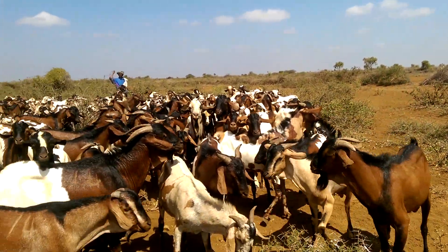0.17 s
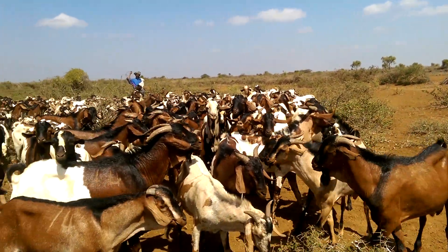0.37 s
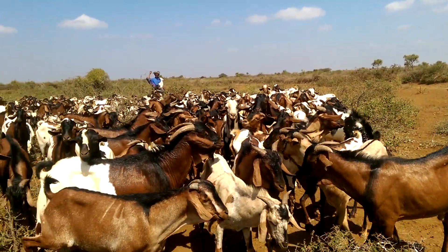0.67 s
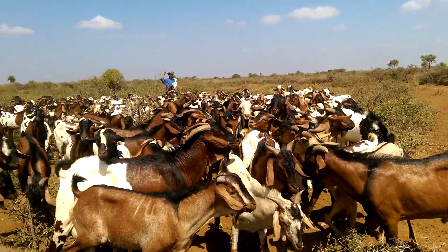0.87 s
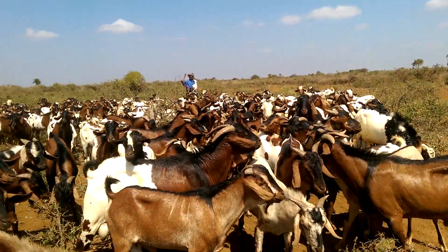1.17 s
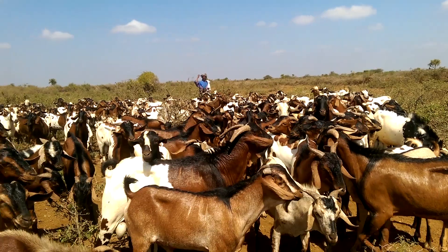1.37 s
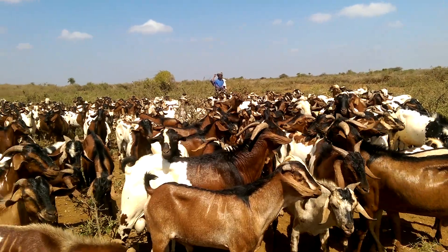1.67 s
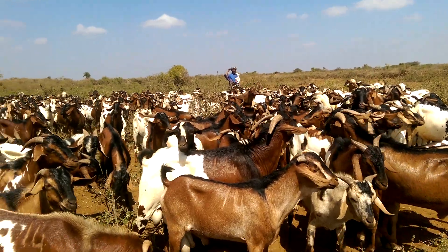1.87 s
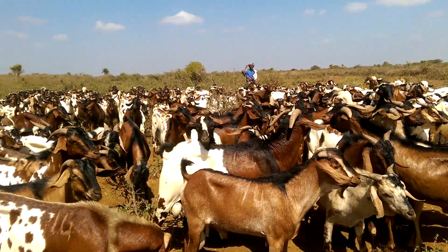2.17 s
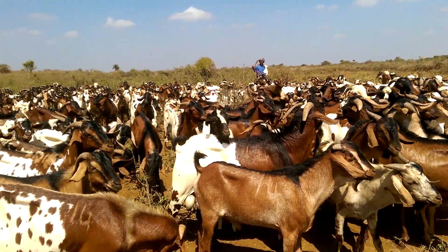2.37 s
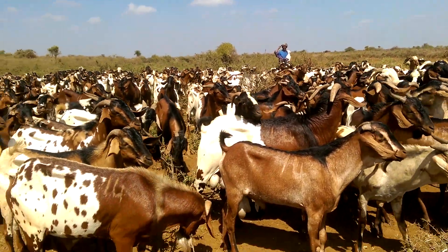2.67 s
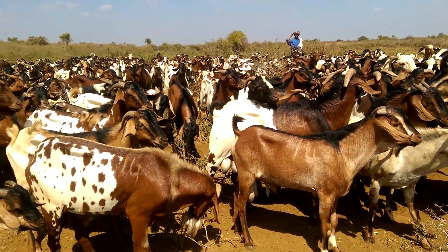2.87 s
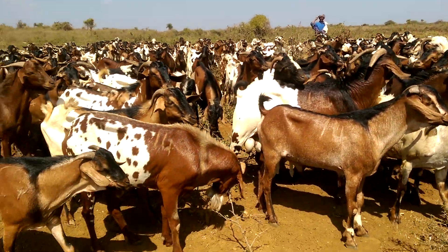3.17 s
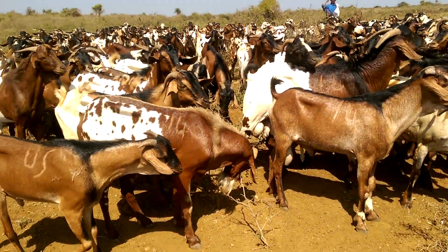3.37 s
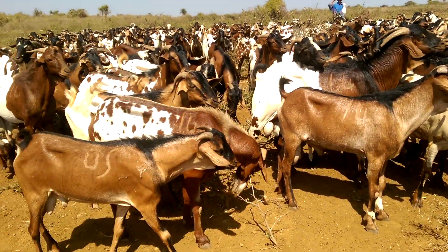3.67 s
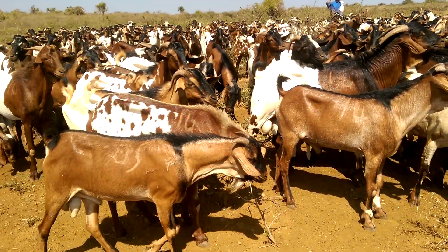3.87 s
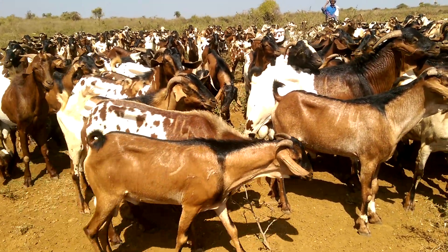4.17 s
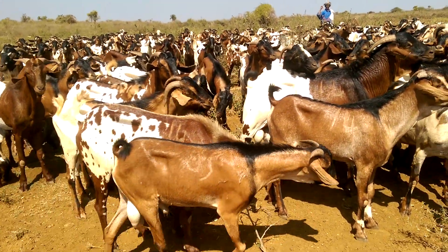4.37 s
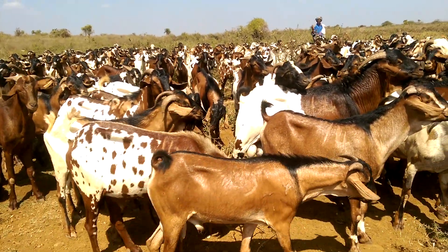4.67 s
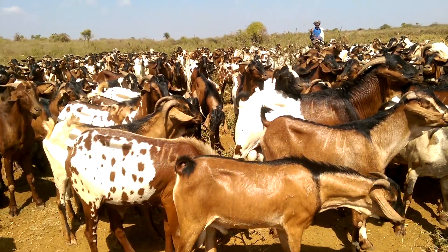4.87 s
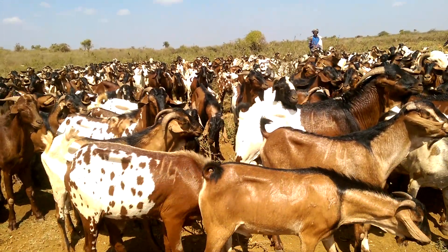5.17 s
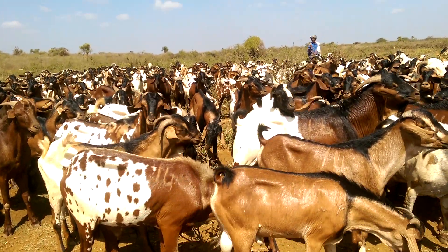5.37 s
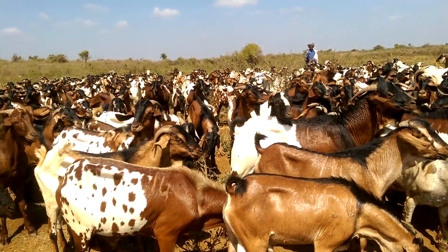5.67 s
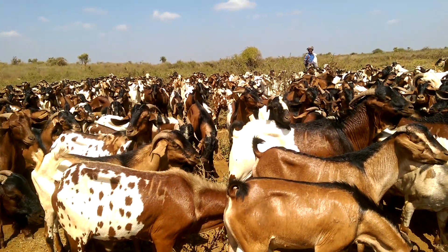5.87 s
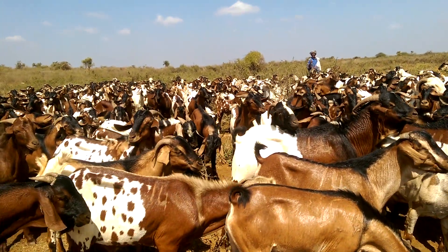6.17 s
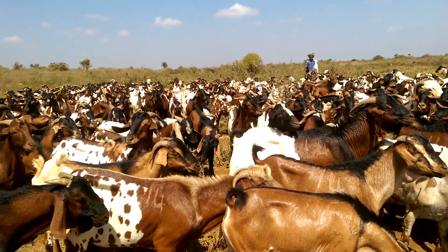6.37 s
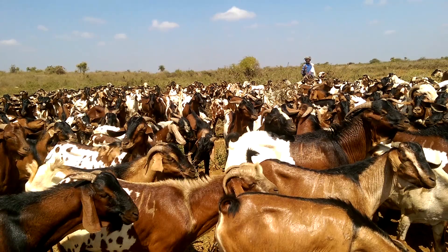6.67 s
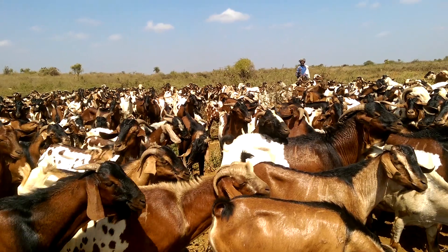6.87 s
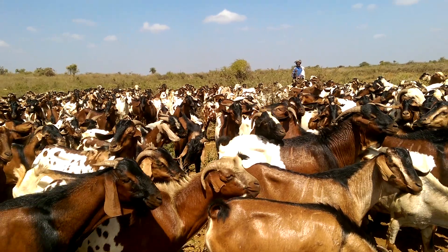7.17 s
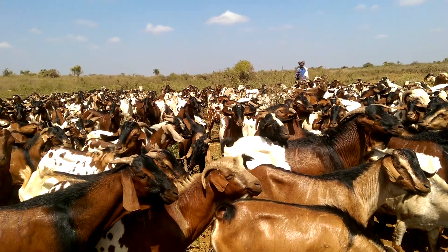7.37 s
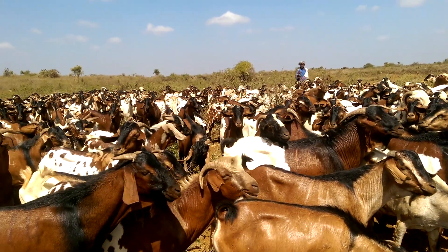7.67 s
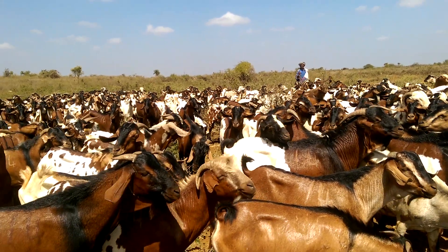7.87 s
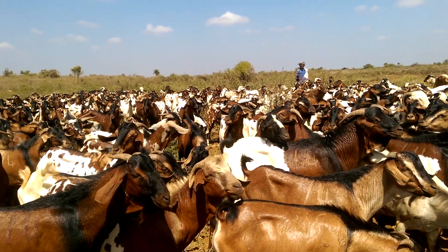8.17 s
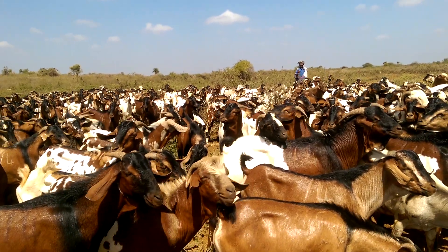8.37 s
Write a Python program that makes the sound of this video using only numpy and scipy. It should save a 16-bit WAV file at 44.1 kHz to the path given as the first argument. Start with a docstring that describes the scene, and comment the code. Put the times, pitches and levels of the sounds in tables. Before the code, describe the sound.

Loud rumbling, fluttering wind nearly covers the soft patter of many goat hooves, with occasional sharp twig snaps and brief scuffs of grit.

```python
"""Goat herd on a windy plain

A large herd of goats shuffles over dry ground while wind rumbles over the two ports of a bare microphone.
Wind is a frozen noise field blown past each port at its own drifting, gusting and lulling speed.
Large eddies thud as decaying low noise; at the right port, filtered noise adds rasps and hisses.
Hooves, mostly to the left, tick and shuffle as random noise bursts, scuff grit and snap twigs with
clicks and decaying grains; distant hooves merge into a wash of coloured noise."""
import sys
import numpy as np
from scipy import signal
from scipy.fft import rfft, irfft
from scipy.io import wavfile
from scipy.ndimage import uniform_filter1d

SR = 44100
rng = np.random.default_rng(int(sys.argv[2]) if len(sys.argv) > 2 else 0)


def bounce(signal):
    """Save signal as a 16-bit WAV file at the path given by the first command-line argument."""
    frames = np.transpose(np.atleast_2d(signal))
    limited = np.clip(frames, -1, 1)
    pcm = np.round(limited * 32767).astype(np.int16)
    wavfile.write(sys.argv[1], SR, pcm)


N = 375291
TIME = np.arange(N) / SR  # s

# How much the air churns rather than streams smoothly, which sets the share of large eddies.
# Each row: time in seconds, relative strength in dB.
CHURN = [(0, -1.5), (.6, -4), (1.2, 0.5), (3.0, 2.5), (4.4, 4), (4.7, 0.5), (5.75, 6.5), (6.1, 0), (7.5, 0),
         (8.5, -6)]
# Spectrum of hooves and twigs on grit. Each row: frequency in Hz, relative gain in dB.
GRIT = [(400, -8.5), (1400, 1.5), (3300, 3.5), (5200, 6.5), (7200, 2.5), (9600, 9), (11500, 2),
        (15500, -18.5)]


def amp(db):
    """Level law: an amplitude ratio is 10 to the power of its decibels over 20."""
    return 10 ** (np.asarray(db) / 20)


def unit(x):
    """Normalisation: scales a signal to an RMS of 1."""
    return x / np.sqrt(np.mean(x ** 2) + 1e-20)


def curve(rows):
    """Linear interpolation: joins (s, value) rows by straight lines."""
    return np.interp(TIME, *np.transpose(rows))


def colour(x, points):
    """Minimum-phase filtering: a causal response of unit energy follows the (Hz, dB) spectrum."""
    size = 1024
    hz, db = np.transpose(points)
    bin_hz = abs(np.fft.fftfreq(size, 1 / SR))
    gain_db = np.interp(np.log(bin_hz + 1), np.log(hz), db)
    log_gain = np.log(amp(gain_db))
    # the Hilbert transform of the log gain supplies the minimum phase
    response = np.exp(np.conj(signal.hilbert(log_gain)))
    taps = np.fft.ifft(response).real[:size // 2]
    return signal.oaconvolve(x, taps / np.linalg.norm(taps))[:N]


def eddies(corner_hz, steepness, size=N):
    """Turbulence spectrum: unit noise, flat up to a corner and falling as a power law above it."""
    hz = np.fft.rfftfreq(size, 1 / SR)
    gain = 1 / (1 + (hz / corner_hz) ** 2) ** (steepness / 2)
    return unit(irfft(rfft(rng.standard_normal(size)) * gain, size))


def butter(x, hz, kind, order):
    """Maximally flat filtering: a causal Butterworth section passes its band without ripple."""
    sections = signal.butter(order, min(hz, .45 * SR), kind, fs=SR, output="sos")
    return signal.sosfilt(sections, x)


def swell(s, length, rise, fall):
    """Generalised Gaussian: a hump of height 1 at s, length wide at 1/e; high exponents square its sides."""
    away, hump = 2 * (TIME - s) / length, np.zeros(N)
    near = abs(away) < 4
    exponent = np.where(away[near] < 0, rise, fall)
    hump[near] = np.exp(-abs(away[near]) ** exponent)
    return hump


def air_speed(drift, port, sway_db, sway_hz, flutter_db, flutter_hz):
    """Superposition of speeds in dB: drift, gusts and lulls, with sway and flutter that grow with churn."""
    # Gusts, from brief slaps to long shoves, by port.
    # Each row: centre in seconds, added air speed in dB, length in seconds.
    gust_rows = {"left": [(.078, 6, 0.056), (.86, 6.5, .016), (1.525, 6.5, 0.045), (1.86, 4.5, 0.07),
                 (2.285, 4, .02), (2.965, 5, 0.093), (3.11, 5.5, 0.055), (3.425, 5.5, 0.055),
                 (3.52, 7, 0.019), (3.568, 5.5, 0.036), (3.634, 5, 0.03), (3.738, 5.5, .02),
                 (3.811, 5.5, .12), (4.003, 5, 0.043), (4.057, 6.5, 0.018), (4.31, 5.5, 0.034),
                 (4.41, 4, 0.075), (4.468, 6, 0.023), (4.538, 5, 0.034), (4.637, 6, 0.015),
                 (4.91, 4.5, 0.037), (5.771, 6, .054), (6.092, 8.5, 0.045), (6.164, 8.5, .11),
                 (6.238, 7.5, 0.075), (6.296, 7.5, 0.032), (6.364, 6, 0.031), (6.529, 8, 0.07),
                 (6.587, 5, 0.037), (6.906, 7.5, 0.13), (7.355, 6, 0.061), (7.52, 3, 0.067),
                 (7.842, 6, .012), (8.155, 4.5, 0.044)], "right": [(.085, 5.5, 0.067), (.897, 3.5, 0.055),
                 (1.235, 4, 0.033), (1.353, 4, 0.039), (2.093, 4, .024), (2.169, 5, 0.018),
                 (2.282, 5.5, 0.0087), (2.43, 4, 0.032), (2.526, 5.5, 0.035), (2.687, 9.5, 0.008),
                 (2.953, 6, 0.0047), (3.018, 4.5, .012), (3.186, 6, .018), (3.616, 5, 0.0061),
                 (3.634, 8, 0.0085), (3.869, 5.5, .018), (3.898, 6, 0.0038), (4.146, 8.5, .016),
                 (4.16, 10.5, 0.0063), (4.338, 6.5, 0.045), (4.401, 8, 0.021), (4.505, 7, 0.055),
                 (4.741, 5.5, .014), (4.815, 5.5, 0.053), (5.11, 5, 0.027), (5.23, 4, 0.041),
                 (5.474, 6, .028), (5.643, 5.5, 0.0097), (5.857, 6, 0.0077), (6.362, 4.5, .016),
                 (6.813, 7, 0.029), (7.071, 9.5, 0.013), (7.101, 8, 0.009), (7.138, 4.5, 0.0081),
                 (7.748, 8.5, .04), (7.842, 5.5, 0.0098), (8.06, 4.5, 0.061), (8.337, 7, 0.016)]}
    # Lulls, when the flow leaves a port for a moment, by port.
    # Each row: centre in seconds, lost air speed in dB, length in seconds.
    lull_rows = {"left": [(2.11, 5, 0.13), (2.381, 6.5, .04), (4.737, 3, .14), (5.068, 6, .022),
                 (5.132, 7, 0.047), (7.44, 7, 0.059), (7.75, 7, .14), (8.239, 7, 0.072),
                 (8.385, 6.5, 0.067)], "right": [(.186, 4, 0.045), (.81, 4, .055), (1.568, 5, 0.076),
                 (2.053, 10, 0.05), (2.339, 5, .024), (2.49, 6, .022), (2.798, 5, 0.099),
                 (3.143, 5.5, .044), (3.665, 3, 0.04), (5.332, 3.5, 0.045), (5.827, 4.5, 0.039),
                 (8.401, 4.5, .028)]}
    slap_s = 0.0782  # the briefer a gust is against this, the more it sweeps the small eddies aside
    top_speed_db = 11  # here sway and flutter are halved: fast air has little room to speed up further

    speed_db, free = curve(drift), np.ones(N)
    for s, db, length in gust_rows[port]:
        shape = swell(s, length, rise=3.5, fall=2.2)
        speed_db = speed_db + db * shape
        free = free * (1 - shape * np.exp(-length / slap_s))
    for s, db, length in lull_rows[port]:
        speed_db = speed_db - db * swell(s, length, rise=3.45, fall=3.45)

    # lopsided flutter: brief puffs stand out of a calmer flow
    puffs = np.tanh(0.249 * np.exp(0.5 * eddies(flutter_hz, 1.7)))
    flutter = flutter_db * unit(puffs - puffs.mean())
    slow = butter(eddies(sway_hz, 4.15), sway_hz / 2, "highpass", order=2)
    sway = sway_db * unit(slow)
    churning = amp(0.712 * np.minimum(curve(CHURN), 1.2))
    unrest = churning / (1 + amp(2 * (speed_db - top_speed_db)))
    return speed_db + free * unrest * (sway + flutter)


def turbulence(speed_db, corner_hz, steepness, growth, large_hz):
    """Frozen turbulence: eddies are carried past the port, so faster air is both louder and higher."""
    field = eddies(corner_hz, steepness, size=2 ** 20)
    field = field / np.sqrt(uniform_filter1d(field ** 2, size=2000))  # equally strong all along its length
    travelled = np.cumsum(amp(speed_db)) % len(field)  # 0 dB moves one field sample per output sample
    passing = np.interp(travelled, np.arange(len(field)), field)
    pressure = passing * amp(growth * speed_db)  # growth: dB of level per dB of speed

    # churning air and sudden surges carry more large, deep eddies, and they arrive in lumps
    large = signal.sosfiltfilt(signal.butter(1, large_hz, fs=SR, output="sos"), pressure)
    surge_db = uniform_filter1d(speed_db, size=1000) - uniform_filter1d(speed_db, size=20000)
    lumps_db = 4.5 * eddies(61.4, 6.1)
    large_db = curve(CHURN) + 0.38 * surge_db + lumps_db - 1.7
    return pressure + (amp(large_db) - 1) * large


def left_wind():
    """Convected turbulence with a steep spectrum: round, dull buffets with deep lulls between them."""
    # Slow drift of the air speed at the left port. Each row: time in seconds, speed in dB over a light breeze.
    drift = [(0, 4), (.7, 3), (1.45, 3.5), (1.62, -2), (2.12, .5), (2.42, 9), (2.82, 0.97), (3.6, 4),
             (4.6, 3), (5.25, 8.5), (5.42, 2.5), (5.97, 1), (6.42, 1.5), (7.02, -5), (7.55, 5.5), (8.51, 0)]
    speed_db = air_speed(drift, port="left", sway_db=0.93, sway_hz=18.71, flutter_db=0.95, flutter_hz=57.7)
    rumble = amp(-23.5) * turbulence(speed_db, corner_hz=166.7, steepness=4.01, growth=1.397, large_hz=134)
    return butter(rumble, 60.7, "highpass", order=2)


def crackle(x, above_hz, depth_db, burst_hz):
    """Intermittency: the smallest eddies come in brief bursts, so the top of the rumble crackles."""
    low = signal.sosfiltfilt(signal.butter(2, above_hz, fs=SR, output="sos"), x)
    bursts = unit(amp(depth_db * eddies(burst_hz, 1.22)))
    return low + (x - low) * bursts


def cavity(x, hz, q, boost_db):
    """Cavity resonance: a hollow in the body adds back a band around its resonance at boost_db."""
    return x + amp(boost_db) * signal.lfilter(*signal.iirpeak(hz, q, fs=SR), x)


def right_wind():
    """Convected turbulence and edge noise: a rougher, brighter flutter with rasps and short hisses."""
    # Slow drift of the air speed at the right port. Each row: time in seconds, speed in dB over a light breeze.
    drift = [(0, 3), (.35, 1.5), (.5, 5), (1, 3.5), (1.65, 3), (2, .5), (2.2, 4.5), (2.4, 5.5), (3.3, 5.5),
             (3.5, 9), (4.6, 5), (4.68, 1), (5.23, 5), (5.98, 4), (6.1, 10), (6.38, 8), (6.63, -3.5),
             (7.43, 5), (7.7, 0.5), (8.51, -1.7)]
    # Air skimming the edge of the port in short hisses.
    # Each row: centre in seconds, relative hiss level in dB, length in seconds.
    skim_rows = [(0.601, -58, 0.32), (1.349, -55.5, 0.092), (3.5, -49.5, 0.26), (3.515, -52.5, 0.093),
                 (3.733, -49, 0.075), (3.797, -50, 0.06), (3.943, -52.5, 0.042), (4.264, -49, 0.029),
                 (4.819, -51.5, 0.04), (5.479, -51, 0.083), (5.644, -53, 0.028), (6.16, -62.5, 0.11),
                 (7.455, -59, 0.1)]
    # Spectra of the skimming hiss and of the tearing rasp. Each row: frequency in Hz, relative gain in dB.
    skim_colour = [(300, -5.5), (1200, 18.5), (2400, 10.5), (4000, -1), (7500, -11), (10000, -24),
                   (15000, -30)]
    rasp_colour = [(500, -14), (2000, -14), (3200, 7), (4800, -15.5), (7200, -20), (10000, -45.5)]

    speed_db = air_speed(drift, port="right", sway_db=1.01, sway_hz=20.14, flutter_db=1.5, flutter_hz=74.34)
    rumble = amp(-23.5) * turbulence(speed_db, corner_hz=194.0, steepness=2.99, growth=0.74, large_hz=132)
    rumble = crackle(rumble, above_hz=1080, depth_db=5.0, burst_hz=170)
    rumble = cavity(rumble, hz=370, q=0.71, boost_db=-6.0)
    rumble = cavity(rumble, hz=3050, q=1.81, boost_db=1.5)
    rumble = butter(rumble, 55.0, "highpass", order=2)
    rumble = butter(rumble, 2810, "lowpass", order=4)

    # in the fastest gusts the flow tears off the edge with a rasp that rings in the port
    tearing = amp(-27.5) / (0.5 + np.exp(0.75 * (16.0 - speed_db)))
    torn_air = rng.standard_normal(N) * tearing * amp(4.1 * eddies(150, 1.6))
    rasp = colour(torn_air, rasp_colour)

    skimming = sum(amp(db) * swell(s, length, rise=4.3, fall=3.2) for s, db, length in skim_rows)
    hiss = rng.standard_normal(N) * skimming * amp(13.0 + 4.0 * eddies(90, 1.06))
    return rumble + rasp + colour(hiss, skim_colour)


def patter(per_s, spread_db, fade_s, count=10):
    """Shot noise: hooves land at random; each patch of ground gives its own short, gritty burst."""
    t, out = TIME[:SR // 10], np.zeros(N)
    for _ in range(count):
        landings = rng.random(N) < per_s / count / SR
        strength_db = spread_db * np.minimum(rng.exponential(1, N), 2.5)
        steps = landings * amp(strength_db)
        burst = rng.standard_normal(len(t)) * np.sqrt(t / fade_s) * np.exp(-t / fade_s)
        burst = butter(burst, rng.uniform(5000, 18000), "lowpass", order=1)
        out += signal.oaconvolve(steps, burst)[:N]
    return unit(colour(out, GRIT))


def far_herd():
    """Incoherent summation: distant hooves merge into a soft, slowly swelling wash of noise."""
    # Spectrum of the distant herd. Each row: frequency in Hz, relative gain in dB.
    wash_colour = [(400, -8), (3000, -4), (7000, -11.5), (9600, -9.5), (12000, -15), (15500, -15.5)]
    return colour(rng.standard_normal(N), wash_colour) * amp(0.48 * eddies(5.9, 2))


def thumps(port, corner_hz, rise_s):
    """Transient pressure: a large eddy bursts on the port and rolls off in a few deep cycles."""
    # Single large eddies, by port. Each row: start in seconds, peak level in dB.
    thump_rows = {"left": [(.238, -5.5), (1.721, -6.5), (1.963, -8.5), (5.76, -5.5), (6.928, -8.5),
                  (8.308, -11.5), (8.432, -8.5)], "right": [(4.393, -9), (5.455, -9), (7.73, -0.5),
                  (8.027, -5.5), (8.33, -8)]}
    out, age = np.zeros(N), TIME[:SR // 10] / rise_s
    for s, db in thump_rows[port]:
        start = round(s * SR)
        push = eddies(corner_hz, 4.2, size=len(age)) * age * np.exp(-age)
        thud = butter(push, corner_hz / 2, "highpass", order=2)
        out[start:start + len(age)] += (amp(db) * thud / abs(thud).max())[:N - start]
    return out


def snaps(crack_s, crumble_s, crumble_db, click_db):
    """Brittle fracture: each break is one broadband click with a gritty crack and a short crumble."""
    # Twigs and pebbles cracking under near hooves. Each row: start in seconds, relative level in dB.
    breaks = [(0.7523, -35.5), (1.0312, -33.5), (1.492, -39.5), (2.1266, -42), (3.8935, -45), (4.23, -45),
              (4.4006, -45), (4.5731, -30.5), (5.4054, -36.5), (5.4401, -41), (6.7527, -30), (8.0446, -42)]
    clicks, grit = np.zeros(N), np.zeros(N)
    for s, db in breaks:
        start = round(s * SR)
        t = TIME[:min(N - start, SR // 10)]
        envelope = np.exp(-t / crack_s) + amp(crumble_db) * np.exp(-t / crumble_s)
        grit[start:start + len(t)] += amp(db) * envelope * rng.choice([-1, 1], len(t))
        clicks[start] += amp(db + click_db)
    return clicks + colour(grit, GRIT)


def scuffs(rise_s, grain_db):
    """Sliding friction: a dragged hoof swells and fades as a spray of grit."""
    # Hooves dragging through grit. Each row: start in seconds, relative level in dB.
    drag_rows = [(0.7523, -42.5), (1.166, -43), (2.1255, -45), (6.035, -45.5), (6.439, -48)]
    envelope = np.zeros(N)
    for s, db in drag_rows:
        age = np.maximum(TIME - s, 0) / rise_s
        envelope += amp(db) * age * np.exp(1 - age)  # peaks at age 1
    spray = unit(rng.standard_normal(N) * amp(grain_db * eddies(300, 2.9)))
    return colour(envelope * spray, GRIT)


def scene():
    """Linear superposition: wind and hooves add at each port, the near hooves weaker and later at the right."""
    cracks = amp(5.0) * snaps(crack_s=0.00025, crumble_s=0.0046, crumble_db=-13.5, click_db=7.5)
    drags = amp(-5.5) * scuffs(rise_s=0.011, grain_db=5.0)
    ticks = amp(-66) * patter(per_s=18, spread_db=3.0, fade_s=0.001)
    shuffles = amp(-63.5) * patter(per_s=42, spread_db=5.5, fade_s=0.0056)
    settling = amp(-0.9 * TIME)  # 0.9 dB quieter each second as the herd comes to a stand
    near = cracks + drags + (ticks + shuffles) * settling

    left = left_wind() + thumps("left", corner_hz=194, rise_s=0.0049) + near + amp(-61.5) * far_herd()
    right = right_wind() + thumps("right", corner_hz=266, rise_s=0.0048) + amp(-65.0) * far_herd()
    # the right port is shaded from the near hooves and hears them a quarter of a millisecond later
    shaded = amp(-13) * np.roll(near, SR // 4000)
    return np.array([left, right + shaded])


def record(dry):
    """Soft saturation: rounds strong buffets off at full scale, fades both ends briefly and limits the band."""
    edge_hz = 15850
    rounded = dry / (1 + dry ** 4) ** (1 / 4)
    faded = rounded * signal.windows.tukey(N, .001)
    lowpass = signal.firwin(511, edge_hz, window=("kaiser", 9), fs=SR)
    return signal.oaconvolve(faded, lowpass[None], "same")


dry = scene()
out = record(dry)
bounce(out)
```